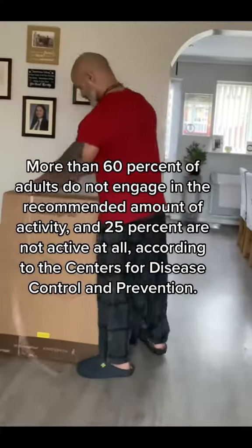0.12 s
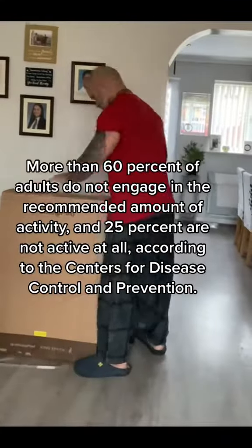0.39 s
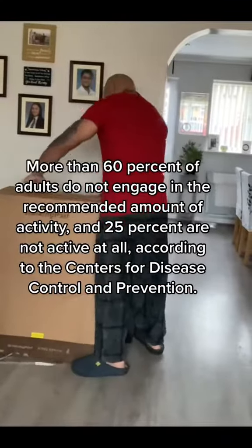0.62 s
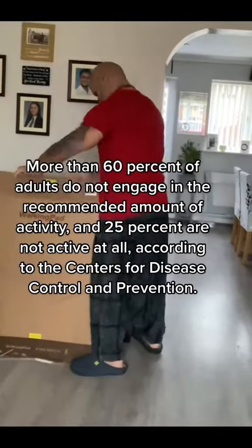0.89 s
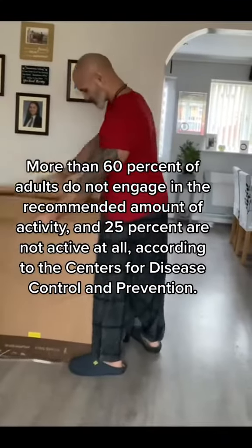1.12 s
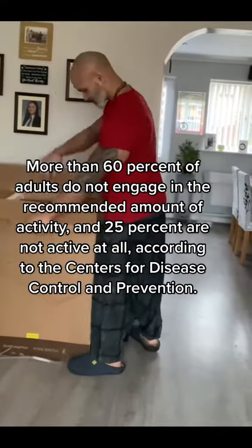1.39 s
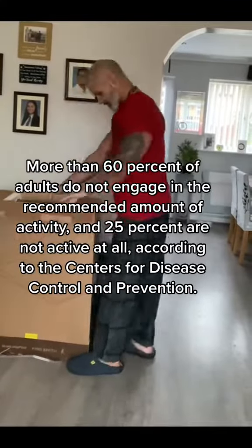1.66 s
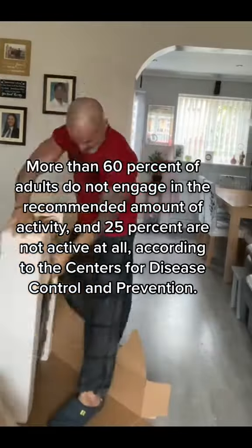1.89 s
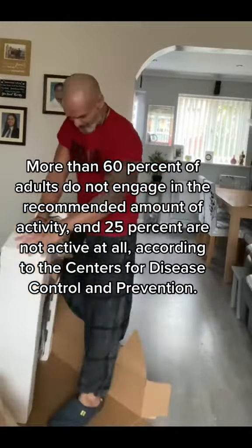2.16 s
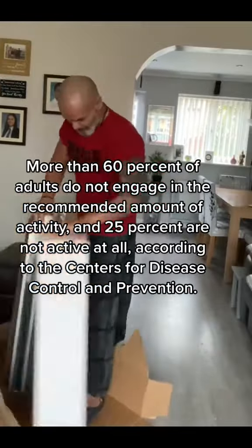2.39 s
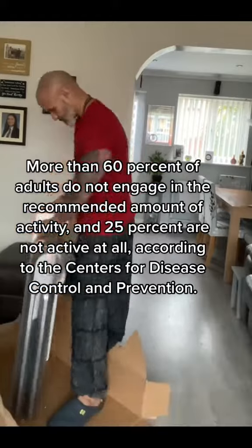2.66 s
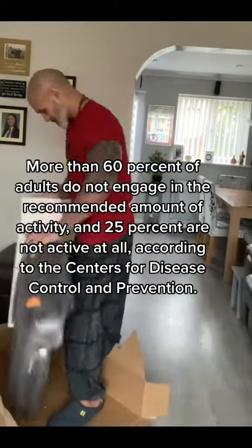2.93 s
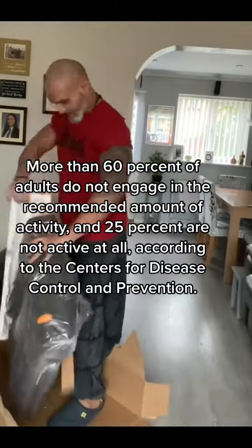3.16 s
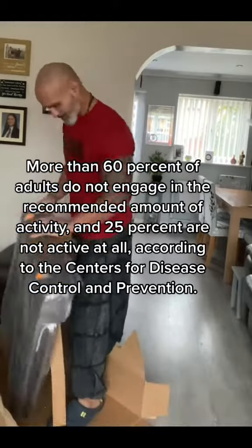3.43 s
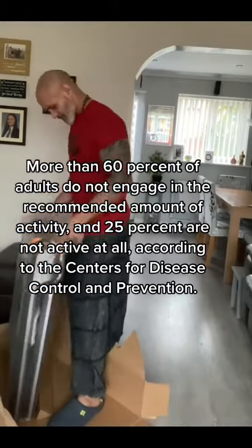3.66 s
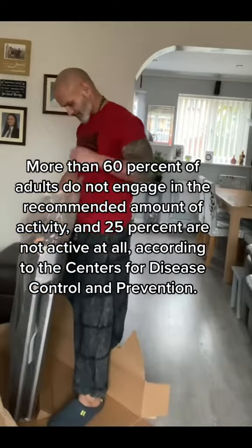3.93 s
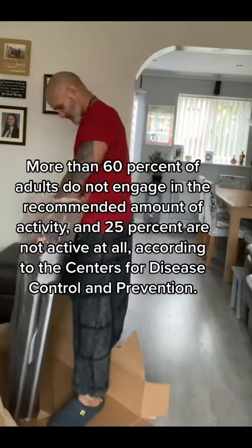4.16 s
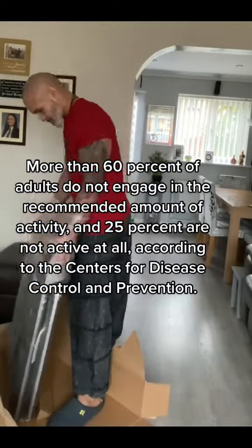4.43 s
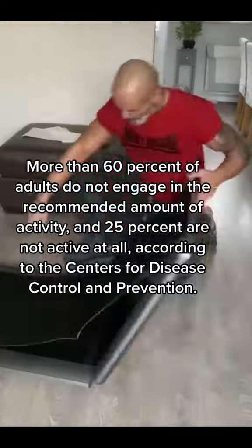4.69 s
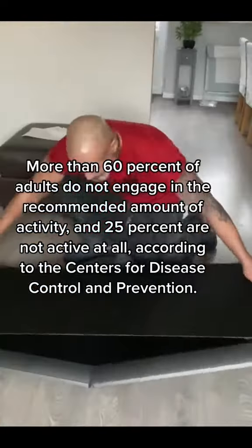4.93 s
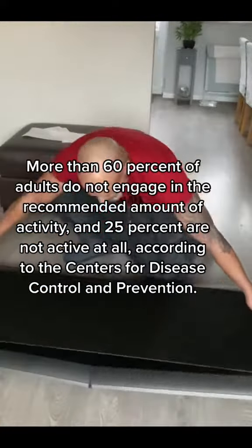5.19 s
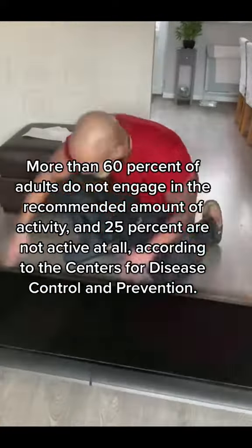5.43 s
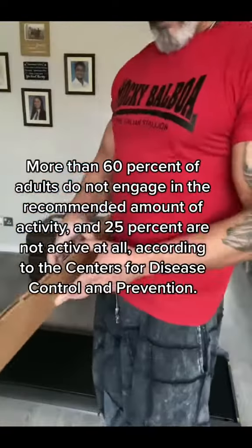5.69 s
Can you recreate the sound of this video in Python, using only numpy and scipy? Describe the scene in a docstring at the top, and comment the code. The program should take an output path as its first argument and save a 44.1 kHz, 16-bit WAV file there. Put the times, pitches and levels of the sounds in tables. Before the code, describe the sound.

Hands hurriedly unpack a large carton in a living room: bright rustles, boxy thuds, crackling wrap, a dense burst of knocks, then near quiet.

```python
"""A living room: hands pull a bulky folded frame out of a cardboard box, played back sped up.
Rubbing over card, foam and plastic wrap is shaped noise: a bright rustle and a rumble of the box.
Knocks ring panel modes of the hollow box, each with a low thump; wrap crackles in short noise bursts.
Each knock and crackle is a short swell at natural pitch, squeezed as by the speed-up.
Two microphones hear it partly alike; the crackles alone add a short room tail."""
import sys
import numpy as np
from scipy import signal
from scipy.fft import rfft, irfft, next_fast_len
from scipy.io import wavfile
from scipy.ndimage import uniform_filter1d

SR = 44100
rng = np.random.default_rng(int(sys.argv[2]) if len(sys.argv) > 2 else 0)


def magnitude_from_level(level_db):
    """Linear magnitude for a level in decibels (20 dB per decade)."""
    exponent = np.asarray(level_db, float) / 20
    return 10 ** exponent


def generate_wav(sig):
    """Save sig (samples, or channels by samples) to the path in sys.argv[1] as 16-bit PCM at SR."""
    pcm = np.round(np.clip(np.atleast_2d(sig).T, -1, 1) * 32767).astype(np.int16)
    wavfile.write(sys.argv[1], SR, pcm)


N = 256617  # length in samples

# hand strokes over card and wrap: start t/s, length t/s, rustle level/dB, box rumble level/dB over the rustle,
# brightness level/dB (treble over middle, turned into a spectral tilt)
STROKES = [(0, 0.065, -49, 1.5, -9), (0.076, 0.066, -58.5, -0.5, 4.5), (0.203, 0.024, -38.5, -5, 14),
           (0.221, 0.013, -31, 1, -17.5), (0.268, .03, -57.5, -12, -2.5), (0.385, 0.023, -46.5, -6, 0.5),
           (.41, 0.033, -51.5, 8.5, -6), (0.515, 0.12, -63, 7, -1), (.63, .08, -57.5, 2.5, -2.5),
           (0.719, 0.075, -52, 0.5, -4.5), (0.814, 0.048, -56.5, 4.5, 1.5), (0.897, 0.031, -47.5, 2, -5),
           (.94, .04, -60.5, 8, 4), (0.992, 0.2, -49, 2, -2), (1.22, 0.015, -34, -1.5, -24),
           (1.246, 0.023, -52.5, 12, -19.5), (1.3, 0.042, -61, 14, -6), (1.375, .17, -50, 0, 0.5),
           (1.56, 0.12, -54.5, -2.5, 5), (1.693, 0.062, -49.5, 2, -1), (1.774, 0.14, -55.5, -4, 2),
           (1.859, .02, -48, -13, 8), (1.89, .05, -35, -6, -0.5), (1.949, .11, -40, -3.5, 3.5),
           (2.086, .03, -51.5, 4.5, 6), (2.138, .05, -41, -5, -2), (2.197, 0.075, -44.5, -6.5, 2.5),
           (2.309, 0.48, -50.5, -1, 3.5), (2.531, .03, -41, -3, -1), (2.565, .03, -40, 10.5, -12),
           (2.612, 0.11, -44.5, -0.5, -2), (2.728, .11, -52, -5.5, 2.5), (2.894, 0.086, -46, -4.5, 3.5),
           (3.037, .04, -47, -10, 6), (3.089, .08, -41.5, 0, 4), (3.17, .075, -42, -1, -5),
           (3.361, .018, -28, 1.5, -9), (3.385, 0.077, -38, 9.5, -12), (3.469, .06, -41.5, 13, -3.5),
           (3.527, 0.044, -48, 2, 2.5), (3.588, .05, -41.5, -2, -3), (3.645, .1, -41.5, -7, -1.5),
           (3.825, .02, -54, -2, 3.5), (3.863, .055, -45.5, -4.5, 0.5), (3.976, 0.093, -52.5, -8, 3),
           (4.027, 0.048, -47, -7.5, -3), (4.096, .06, -59, -4.5, -1), (4.241, .04, -48.5, -5.5, -1.5),
           (4.293, .085, -44, -6.5, -3.5), (4.383, 0.11, -41, -8.5, 3), (4.507, 0.11, -52, -5, 0.5),
           (4.691, .08, -63.5, 6.5, -7.5), (4.781, .1, -62.5, -1, -5.5), (4.889, 0.059, -70, 2, -8.5),
           (5.034, 0.091, -64, 4, -9), (5.15, 0.029, -52.5, 2.5, -10.5), (5.271, .02, -50.5, 9.5, -13.5),
           (5.282, 0.015, -41.5, 5.5, -15.5), (5.36, 0.095, -69, -1, -2.5),
           (5.482, 0.015, -61.5, -16, -5.5), (5.584, 0.21, -65.5, -1, -3.5)]
# faint shifting under the strokes: t/s, rustle level/dB, rumble level/dB
FAINT_SHIFTING = [(0, -71, -66), (.45, -70, -69), (3.0, -62, -70.5), (4.55, -65.5, -68), (4.95, -86, -73),
                  (5.6, -88, -77.5)]
# spectrum of the rustle as heard in the finished sound, cut steeply above 12.8 kHz: f/Hz, relative level/dB
HEARD_RUSTLE = [(500, -16), (900, -2.5), (1500, 1), (2500, 1.5), (4000, -4.5), (6000, -8), (10000, -14),
                (12800, -16.5), (13400, -27.5), (16000, -34)]
# spectrum of the shaken box between its modes: f/Hz, relative level/dB
RUMBLE_SPECTRUM = [(25, -26.5), (60, -26), (110, -0.5), (160, 1), (400, -1.5), (900, -3.5), (1300, -11.5),
                   (2500, -34)]
# panel modes of the box: f/Hz, half width f/Hz, relative level/dB
BOX_MODES = [(55, 30, 7.5), (84.4, 30, -14), (128, 36, 2.5), (160, 25, 8), (211, 18, 0.5), (271.2, 33, 4),
             (327.6, 22, -1), (366.5, 7.2, -1), (444, 31, 0.5), (511, 60, -2), (586.5, 25, -1.5),
             (676, 85, -0.5), (770, 45, -1), (885, 18, 0), (1014, 130, 5), (1200, 140, 5.5)]
# panels that the rubbing shakes: t/s, centre of the rumble f/Hz
RUBBED_PANELS = [(0, 200.3), (.22, 520), (.42, 200), (.8, 330), (1.0, 240), (1.22, 330), (1.33, 180),
                 (1.5, 350), (2.0, 330), (2.16, 550), (2.4, 370), (2.6, 490), (3.05, 351), (3.25, 568),
                 (3.45, 390), (3.7, 517), (4.45, 458), (5.0, 310), (5.35, 220), (5.55, 520)]
# knocks on the box: peak of the ring t/s, panel ring level/dB, its centre f/Hz, hollow thump level/dB,
# halving time of the ring's fall t/ms
KNOCKS = [(.027, -54, 400, -39, 7.5), (.061, -37, 534, -64, 4.3), (.233, -20.5, 500, -33, 2.7),
          (.389, -39.5, 507, -62, 2), (.416, -45, 300, -28.5, 2.3), (.552, -57, 450, -49, 8),
          (.622, -38.5, 372, -41, 3.2), (.668, -46.5, 740, -66, 3), (.7, -62, 530, -48, 3.5),
          (.783, -39, 467, -43, 4.5), (.835, -35, 435, -42, 3.4), (.906, -41, 520, -43, 4.9),
          (.942, -60, 453, -47.5, 11), (1.002, -42, 460, -39, 4), (1.033, -36, 524, -34.5, 2.1),
          (1.073, -36.5, 563, -28.5, 4.7), (1.123, -36.5, 545, -35, 3.9), (1.214, -30, 800, -38, 5.3),
          (1.23, -18.5, 543, -22.5, 6), (1.318, -52, 530, -66, 6.1), (1.377, -52, 450, -34, 3),
          (1.424, -38.5, 593, -47, 6), (1.514, -41, 584, -44.5, 8.1), (1.62, -41.5, 484, -47, 6.5),
          (1.731, -55, 450, -46, 2.7), (1.758, -42.5, 515, -50, 6.2), (1.846, -65, 450, -48, 4),
          (1.904, -18, 437, -25, 3.4), (1.948, -35.5, 468, -56, 4), (2.038, -34.5, 455, -33, 7),
          (2.144, -23.5, 770, -31.5, 2.7), (2.193, -55, 650, -72, 6.5), (2.229, -57, 550, -54, 5),
          (2.338, -43, 620, -62, 6.7), (2.382, -30, 330, -29, 2.4), (2.434, -29, 464, -29.5, 6.4),
          (2.465, -33.5, 448, -41, 8.3), (2.562, -25, 580, -46, 3.2), (2.576, -12.5, 502, -30, 2.4),
          (2.58, -38, 120, -50, 8), (2.674, -36, 493, -41, 2.9), (2.732, -37, 386, -46.5, 2.4),
          (2.806, -52, 460, -44, 3.9), (2.932, -42.5, 493, -58, 5), (2.966, -46, 403, -47, 6),
          (3.045, -49.5, 463, -52, 7.2), (3.093, -60, 450, -50, 12), (3.128, -44, 482, -43.5, 13),
          (3.171, -33.5, 900, -57.5, 17), (3.238, -35, 710, -59.5, 3.1), (3.296, -56, 550, -71.5, 5),
          (3.363, -21, 400, -29, 5), (3.378, -16, 440, -30, 12), (3.42, -13.5, 370, -24, 5.7),
          (3.452, -22, 417, -43, 6.1), (3.486, -13, 400, -34.5, 11.7), (3.512, -16.5, 380, -27, 3.2),
          (3.528, -19.5, 380, -30, 5), (3.555, -28.5, 395, -45.5, 2.3), (3.585, -25.5, 683, -33, 10.1),
          (3.672, -40, 402, -53.5, 9.2), (3.83, -52.5, 560, -70, 7.7), (3.866, -41, 542, -55.5, 4.6),
          (4.044, -47.5, 576, -66, 11), (4.266, -41.5, 525, -62, 4.7), (4.306, -36.5, 507, -56, 3),
          (4.366, -53, 540, -71, 7), (4.505, -62, 450, -57, 3), (4.717, -53.5, 424, -60, 8.3),
          (4.799, -53, 434, -70, 6.2), (4.858, -49, 430, -64, 6.5), (5.032, -52.5, 350, -63, 5.5),
          (5.061, -47, 433, -51.5, 11), (5.159, -39, 390, -40.5, 5.1), (5.239, -47.5, 560, -60, 5),
          (5.286, -21.5, 490, -26, 3.3), (5.33, -60, 135, -62, 35), (5.389, -53.5, 517, -57.5, 14),
          (5.495, -54, 660, -70, 4.5), (5.584, -54.5, 635, -72, 10.6), (5.633, -51.5, 800, -76, 4.5),
          (5.68, -52, 820, -74, 2.5), (5.812, -51, 503, -65, 5.3)]
# how widely a blow rings the panels, a taut, free panel on few notes: t/s, spread/octaves (at least 0.1)
PANEL_SPREAD = [(0, 0.5), (1.15, 0.59), (1.23, 0.37), (1.3, 0.53), (2.2, 0.65), (2.4, 0.46), (2.575, .36),
                (2.68, 0.47), (3.1, .4), (3.17, .14), (3.24, .25), (3.37, 0.42), (3.42, 0.12), (3.455, .36),
                (3.486, .2), (3.555, 0.097), (3.585, .6), (5.55, 0.52), (5.64, .25), (5.8, .6)]
# air space of the emptying box: t/s, centre of the thump f/Hz
HOLLOW_AIR = [(0, 165), (1.8, 162), (2.2, 195), (3.5, 192), (4.6, 185), (5.3, 150)]
# crackles and scrape jerks: peak t/s, level/dB, centre f/Hz, halving time of the rise t/ms, of the fall t/ms
# (halving times of at least 1 ms)
CRACKLES = [(.06, -44, 3800, 1.5, 6), (.189, -40.5, 3000, 1.5, 17), (.229, -26, 2740, 6.6, 1.8),
            (.271, -48, 2840, 18, 3.7), (.381, -40.5, 5500, 1.2, 5), (.389, -33, 6730, 3.2, 2),
            (.414, -48.5, 3660, 2.3, 5.7), (.446, -54, 4210, 3, 2), (.479, -57.5, 4900, 5.6, 8.2),
            (0.622, -56, 4820, 13, 10), (.664, -41.5, 1850, 2.2, 9.2), (.74, -41, 4260, 1.5, 9.7),
            (.779, -41, 4400, 9, 10.5), (.831, -42, 3280, 6.1, 8.6), (.994, -43.5, 3100, 1.5, 10),
            (1.07, -41.5, 3440, 2, 3.4), (1.125, -35, 3250, 3.9, 5.3), (1.213, -48, 1760, 1.6, 7.2),
            (1.228, -27.5, 1790, 3, 2.5), (1.315, -52.5, 4540, 5.3, 8.1), (1.381, -39.5, 3630, 3.1, 2.7),
            (1.427, -36.5, 4500, 2.7, 6), (1.519, -42.5, 3280, 4.7, 5.3), (1.62, -44.5, 3180, 1.4, 7.2),
            (1.72, -49.5, 3550, 18, 7.7), (1.877, -39.5, 4020, 1.3, 8), (1.904, -20, 4280, 4, 1.7),
            (1.944, -34.5, 4450, 2, 5.9), (2.013, -39, 5150, 4.4, 17), (2.099, -43, 5740, 5, 6.2),
            (2.132, -25.5, 2260, 2, 13.5), (2.141, -25.5, 2720, 2.5, 3.5), (2.192, -40, 4230, 7.6, 8.8),
            (2.337, -50.5, 4100, 5.7, 9), (2.377, -50, 5550, 2.2, 5.4), (2.426, -37.5, 2310, 1.1, 3),
            (2.47, -48.5, 5520, 2, 15), (2.543, -36, 4430, 3.5, 10.5), (2.573, -23, 2080, 1.6, 2.4),
            (2.673, -41.5, 4200, 43, 8.1), (2.732, -41.5, 4100, 25, 11), (2.804, -54.5, 4500, 38, 8.1),
            (2.903, -44.5, 4500, 2.8, 27), (2.993, -44, 6830, 7.8, 5.6), (3.179, -40, 1920, 9.9, 4.1),
            (3.232, -42.5, 3420, 5, 12.6), (3.292, -52, 5040, 4.4, 14), (3.332, -48.5, 4110, 1.2, 3),
            (3.355, -27, 3930, 1.3, 11), (3.419, -44.5, 2226, 4.9, 4.1), (3.459, -33, 2075, 4, 5.5),
            (3.488, -34, 2373, 1.5, 16), (3.578, -28.5, 1500, 1.1, 7.2), (3.591, -27, 2250, 3.2, 5.1),
            (3.669, -40, 4510, 16, 9), (3.736, -43.5, 4030, 29, 4.5), (3.86, -40.5, 3200, 1.3, 15),
            (3.902, -47, 4660, 3.9, 21), (4.035, -44.5, 3750, 3.9, 20), (4.162, -58.5, 4070, 3.6, 25),
            (4.252, -50, 3480, 4, 12), (4.312, -42.5, 4460, 20, 22), (4.541, -46.5, 4370, 5, 4.3),
            (4.796, -60, 2780, 9, 4.5), (4.858, -52, 3200, 2.4, 6.5), (5.065, -49, 2500, 3, 8.5),
            (5.156, -44, 2000, 2.5, 2.4), (5.186, -64, 2400, 10, 8.2), (5.238, -50.5, 2040, 2.2, 5.3),
            (5.275, -35, 2990, 2.5, 7.5), (5.285, -28, 2770, 1.5, 3.7), (5.313, -48.5, 2800, 4.9, 10),
            (5.396, -61, 2060, 3.9, 2), (5.466, -58, 6400, 2, 11), (5.494, -52, 2580, 4.4, 2),
            (5.633, -62, 3200, 4.3, 15), (5.679, -55, 3460, 2, 2.9), (5.756, -62, 3950, 7, 9.3),
            (5.812, -55, 1980, 2.6, 6)]
# what crackles, wrap and tape wide, stiff card and the frame narrow: t/s, spread/octaves
CRACKLE_SPREAD = [(0, 0.99), (.4, 0.88), (.62, 0.98), (.665, 0.34), (.74, 0.72), (1.0, .9), (1.22, 0.38),
                  (1.32, 0.83), (2.1, .9), (2.135, 0.54), (2.43, 1.2), (2.575, 0.64), (2.68, .9),
                  (3.36, 0.73), (4.9, .8), (5.2, 0.76), (5.28, .4), (5.5, 0.69), (5.7, 1.26)]
# likeness of the two finished channels before the unlike part is raised; they grow more alike
# near 13 kHz, at the upper edge of the sound: f/Hz, likeness (0 to 1)
CHANNEL_LIKENESS = [(60, .93), (180, 0.95), (400, .75), (800, 0.32), (2000, .5), (6000, 0.34), (11000, .45),
                    (13000, 0.75)]
# balance of the two channels: f/Hz, left over right level/dB
LEFT_OVER_RIGHT = [(60, -0.5), (150, -2), (380, -7), (950, -2), (2380, 2.5), (5980, 0), (15000, 0.0)]

# a stroke digs in, sags over its length and lets go
RISE_DB_PER_S, SAG_DB, RELEASE_DB_PER_S = 898.5, 3.5, 423.5
RING_RISE_MS = 4.54
# the thump peaks after the ring and falls more slowly by a factor
THUMP_LAG_S, THUMP_RISE_MS, THUMP_OCTAVES, THUMP_LONGER = .0025, 5.5, 0.27, 1.47
# thumps above this level come later and last longer still
HEAVY_DB, HEAVY_LAG_S_PER_DB, HEAVY_MS_PER_DB = -30, .0005, 0.45
UNLIKE_BOOST_DB = 3  # raises the part that differs between the two channels


def evened(x):
    """Scales to rms 1."""
    return x / np.sqrt(np.mean(x ** 2) + 1e-20)


def read(points, hz):
    """Reads a spectrum on a log-frequency axis."""
    f, value = np.transpose(points)
    return np.interp(np.log(hz + 1), np.log(f + 1), value)


def at_time(points, t):
    """Reads a two-column course over time."""
    return np.interp(t, *np.transpose(points))


def bump(hz, centre_hz, octaves):
    """Gain of a bell on a log-frequency axis."""
    distance = np.log2((hz + 1) / centre_hz) / max(octaves, .1)
    return np.exp(-.25 * distance ** 2)


def strokes(t):
    """Power of each stroke over time: steep rise, sagging hold, release."""
    start, length, db = np.transpose(STROKES)[:3, :, None]
    since = t - start
    rise_db = RISE_DB_PER_S * np.maximum(-since, 0)
    sag_db = SAG_DB * np.clip(since, 0, length) / length
    release_db = RELEASE_DB_PER_S * np.maximum(since - length, 0)
    return magnitude_from_level(db - rise_db - sag_db - release_db) ** 2


def friction(gain, size, patchy_db, flicker_db):
    """Two unrelated noises shaped by gain(hz, t), with spectral patches and stick-slip level flicker."""
    hop = size // 4
    frames, hz = N // hop + 5, np.fft.rfftfreq(size, 1 / SR)
    z = rng.standard_normal((frames, len(hz), 5)).T
    patches = evened(uniform_filter1d(uniform_filter1d(z[4], 8, 0), 6, 1))
    # stick and slip: sudden starts that die away
    jerks = np.minimum(rng.exponential(1, frames), 4) ** 2
    flicker = evened(signal.lfilter([1], [1, -.85], jerks - jerks.mean()))
    shape = gain(hz[:, None], np.arange(frames) * hop / SR) * magnitude_from_level(patchy_db * patches)
    # only the flicker moves the level from frame to frame
    shape *= magnitude_from_level(flicker_db * flicker) / np.sqrt((shape ** 2).mean(0))
    spectra = (z[:2] + 1j * z[2:4]) * shape
    return evened(signal.istft(spectra, nperseg=size, noverlap=size - hop)[1][:, :N])


def handling():
    """Dense friction grains: a bright rustle, and a rumble where the rubbing shakes the panels."""
    s = np.arange(0, N / SR, .002)  # control steps of 2 ms
    power = strokes(s)
    box_db, treble_db = np.transpose(STROKES)[3:, :, None]
    faint_s, faint_db, faint_box_db = np.transpose(FAINT_SHIFTING)
    rubbing = power.sum(0) + magnitude_from_level(np.interp(s, faint_s, faint_db)) ** 2
    sheen_db = (power * treble_db).sum(0) / rubbing
    shaking = (power * magnitude_from_level(box_db) ** 2).sum(0) + magnitude_from_level(np.interp(s, faint_s, faint_box_db)) ** 2
    t = np.arange(N) / SR

    def bright(hz, at):
        """More plastic than card tilts the rustle upwards."""
        tilt_db_per_octave = 0.41 * (np.interp(at, s, sheen_db) + 2)
        octaves = np.log2(np.clip(hz, 1200, 12000) / 3500)
        return magnitude_from_level(read(HEARD_RUSTLE, hz) + tilt_db_per_octave * octaves)

    def hollow(hz, at):
        """Broad rumble with the panel modes standing out."""
        modes = sum(magnitude_from_level(db) / np.sqrt(1 + ((hz - f) / w) ** 2) for f, w, db in BOX_MODES)
        shaken = 0.16 + bump(hz, at_time(RUBBED_PANELS, at), 0.94)
        return magnitude_from_level(read(RUMBLE_SPECTRUM, hz)) * (.6 + modes) * shaken

    rustle = friction(bright, size=256, patchy_db=1.0, flicker_db=1.52)
    rumble = friction(hollow, size=1024, patchy_db=2.0, flicker_db=0.37)
    return rustle * np.interp(t, s, np.sqrt(rubbing)) + rumble * np.interp(t, s, np.sqrt(shaking))


def swell(rise_ms, fall_ms, rise_power, fall_power):
    """Envelope round a peak: the loss in dB grows as a power of the time from it, 6 dB at the halving time."""
    ms = np.arange(-4096, 4096) / SR * 1000
    rise = (abs(ms) / max(rise_ms, 1)) ** rise_power
    fall = (abs(ms) / max(fall_ms, 1)) ** fall_power
    return ms / 1000, magnitude_from_level(-6 * np.where(ms < 0, rise, fall))


def swelled(sound, envelope, db):
    """Puts a sound under its envelope, with the level set about the peak."""
    weight = envelope ** 4
    power = (sound ** 2 * weight).sum(1) / weight.sum()
    return magnitude_from_level(db) * envelope * sound / np.sqrt(power)[:, None]


def knock(db, hz, octaves, rise_ms, fall_ms, draw):
    """The blow rings the panel modes near its centre; they meet roughly in step about the peak."""
    t, envelope = swell(rise_ms, fall_ms, rise_power=1.27, fall_power=1.05)
    f, width, mode_db = np.transpose(BOX_MODES)
    # chance differences for each of the two parts and each mode
    detune, size, phase = draw.reshape(3, 2, len(BOX_MODES), 1)
    height = (magnitude_from_level(mode_db) * bump(f, hz, octaves))[:, None] * magnitude_from_level(3.4 * size)
    turns = (f[:, None] + 0.42 * width[:, None] * detune) * t
    ring = (height * np.sin(2 * np.pi * turns + 1.35 * phase)).sum(1)
    return swelled(ring, envelope, db)


def crackle(db, hz, octaves, rise_ms, fall_ms, draw):
    """A noise burst for fine snaps, coloured round its centre with a few chance resonances."""
    _, envelope = swell(rise_ms, fall_ms, rise_power=0.83, fall_power=1.3)
    f = np.fft.rfftfreq(len(envelope), 1 / SR)
    lumps = evened(uniform_filter1d(draw[2, :len(f)], 40))
    # the finished sound is dimmed above 10 kHz and cut steeply above 12.8 kHz, here as in the rustle
    top_db = np.minimum(read(HEARD_RUSTLE[-4:], f) - HEARD_RUSTLE[-4][1], 0)
    colour = bump(f, hz, octaves) / np.sqrt(f + 300) * magnitude_from_level(0.93 * lumps + top_db)
    snaps = irfft(rfft(draw[:2]) * colour)
    return swelled(snaps, envelope, db)


def direct(sound, db, unlike_db=-7.5):
    """A blow arrives mostly straight, the louder the more so: its unlike part is weaker."""
    return sound * magnitude_from_level([[0], [min(unlike_db - 0.091 * (db + 46.5), 0)]])


def add(mix, s, sound):
    """Mixes a sound in with its middle at s."""
    at = round(s * SR) - sound.shape[1] // 2
    a, b = max(at, 0), min(at + sound.shape[1], N)
    mix[:, a:b] += sound[:, a - at:b - at]


def room(x, t60, level_db, fade_in_s):
    """Short diffuse tail of the furnished room, different for the common and the unlike part."""
    t = np.arange(SR // 4) / SR
    tail = rng.standard_normal((2, len(t))) * magnitude_from_level(-60 * t / t60) * np.clip(t / fade_in_s, 0, 1)
    tail /= np.linalg.norm(tail, axis=1, keepdims=True)
    return magnitude_from_level(level_db) * signal.oaconvolve(x[:1], tail, axes=1)[:, :N]


def two_channels(pair):
    """Left and right share a common part and differ by an unlike one; low middle leans right, then left."""
    size = next_fast_len(N)
    hz = np.fft.rfftfreq(size, 1 / SR)
    same = np.clip(read(CHANNEL_LIKENESS, hz), 0, .99)
    common, unlike = rfft(pair, size)
    unlike *= np.sqrt((1 - same) / (1 + same))
    lean = magnitude_from_level(read(LEFT_OVER_RIGHT, hz) / 2)
    left, right = (common + unlike) * lean, (common - unlike) / lean
    return irfft(np.array([left, right]) * 2 / (lean + 1 / lean), size)[:, :N]


def add_knocks(mix):
    """Each blow rings the panels, then thumps the air space a little later."""
    draws = rng.standard_normal((len(KNOCKS), 2, 6 * len(BOX_MODES)))
    for (s, db, hz, thump_db, fall_ms), draw in zip(KNOCKS, draws):
        ring = knock(db, hz, at_time(PANEL_SPREAD, s), RING_RISE_MS, fall_ms, draw[0])
        add(mix, s, direct(ring, db, unlike_db=-4.0))
        heavy_db = max(thump_db - HEAVY_DB, 0)
        thump_fall_ms = THUMP_LONGER * fall_ms + HEAVY_MS_PER_DB * heavy_db
        thump = knock(thump_db, at_time(HOLLOW_AIR, s), THUMP_OCTAVES, THUMP_RISE_MS, thump_fall_ms, draw[1])
        add(mix, s + THUMP_LAG_S + HEAVY_LAG_S_PER_DB * heavy_db, direct(thump, thump_db))


def crackling():
    """All crackles and scrape jerks, with their room tail."""
    dry_crackles = np.zeros((2, N))
    for s, db, hz, rise_ms, fall_ms in CRACKLES:
        draw = rng.standard_normal((3, 8192))
        burst = crackle(db, hz, at_time(CRACKLE_SPREAD, s), rise_ms, fall_ms, draw)
        add(dry_crackles, s, direct(burst, db))
    return dry_crackles + room(dry_crackles, t60=0.096, level_db=-12.5, fade_in_s=0.0019)


def scene():
    """Handling noise with the knocks and crackles on top, spread over two channels."""
    mix = handling()  # row 0: common part, row 1: unlike part
    add_knocks(mix)
    mix += crackling()
    mix[1] *= magnitude_from_level(UNLIKE_BOOST_DB)
    return two_channels(mix)


def roll_off(x):
    """The treble ends steeply here."""
    return signal.sosfilt(signal.butter(12, 15740, fs=SR, output="sos"), x)


def record(dry):
    """Takes the finished stereo mix to its stored form."""
    return roll_off(dry)


dry = scene()
out = record(dry)
generate_wav(out)
```